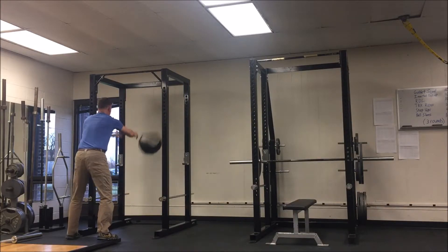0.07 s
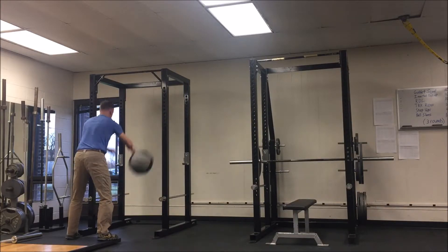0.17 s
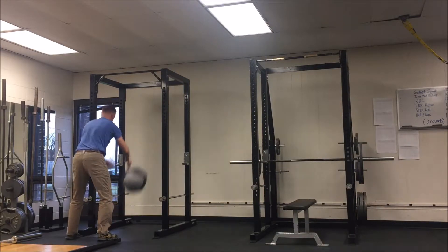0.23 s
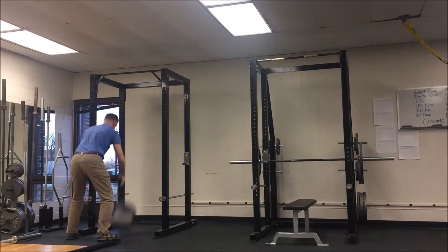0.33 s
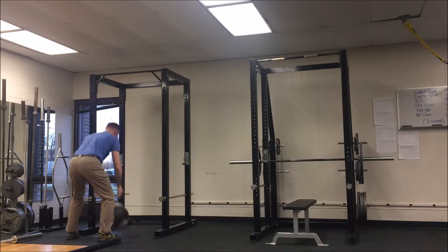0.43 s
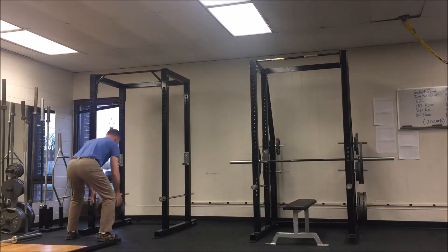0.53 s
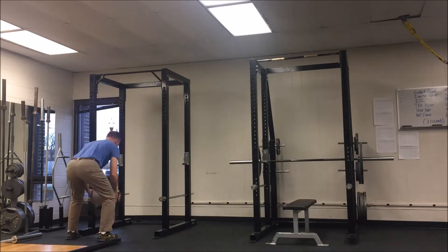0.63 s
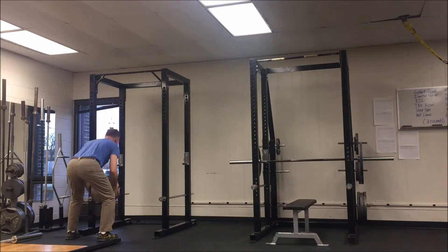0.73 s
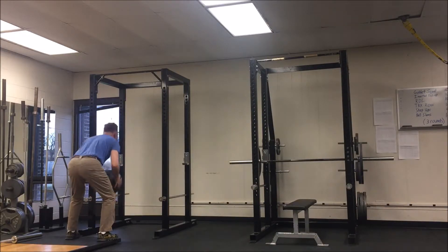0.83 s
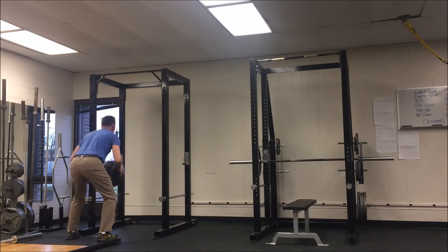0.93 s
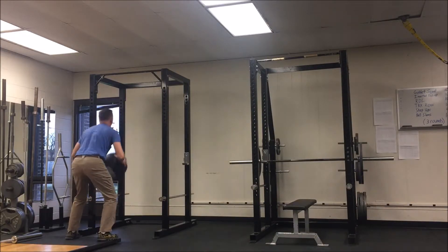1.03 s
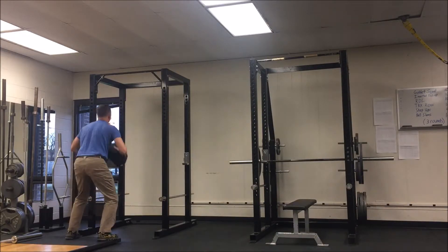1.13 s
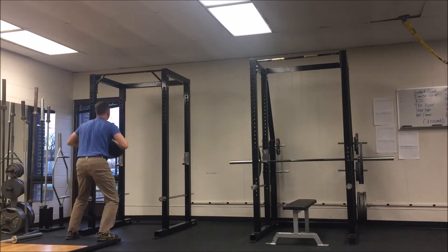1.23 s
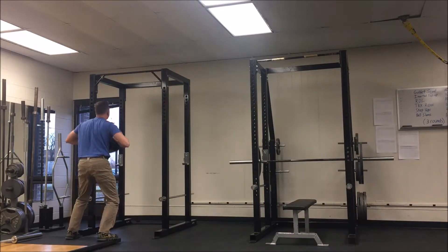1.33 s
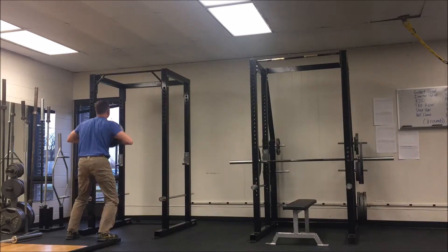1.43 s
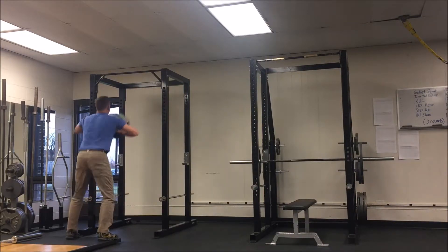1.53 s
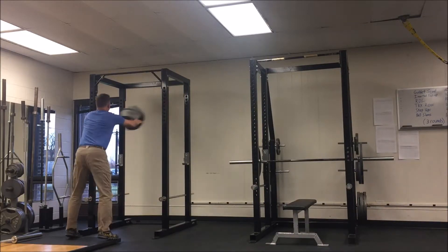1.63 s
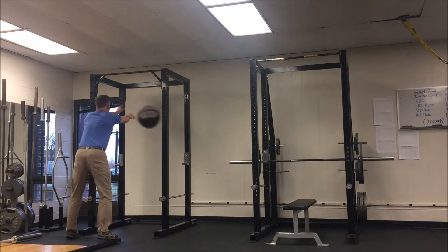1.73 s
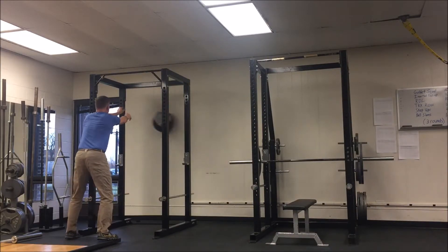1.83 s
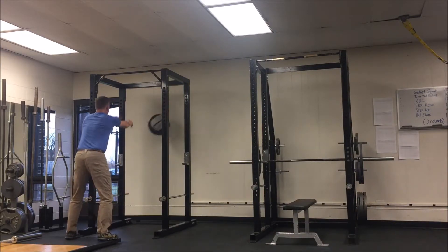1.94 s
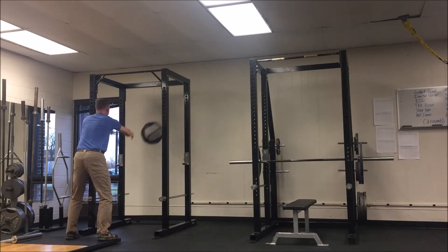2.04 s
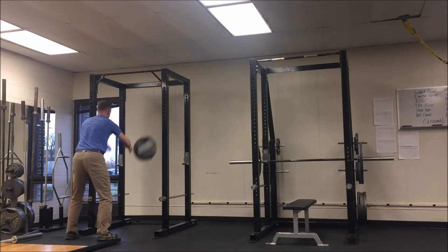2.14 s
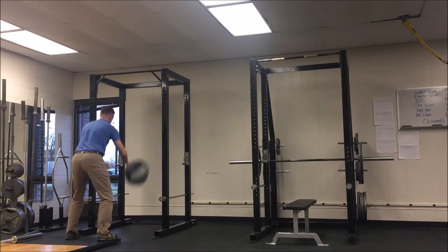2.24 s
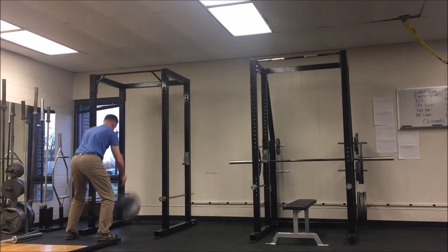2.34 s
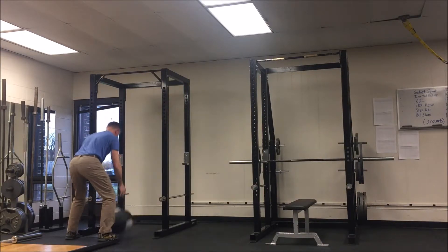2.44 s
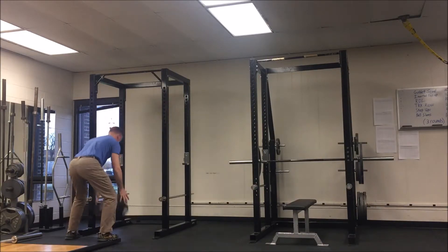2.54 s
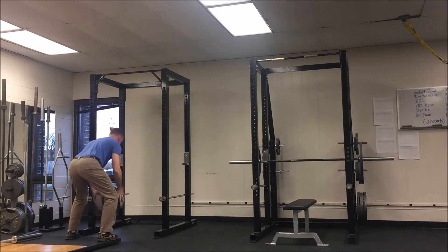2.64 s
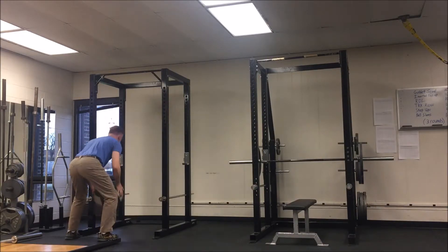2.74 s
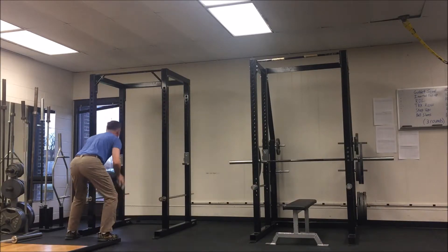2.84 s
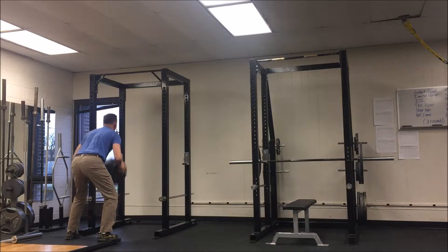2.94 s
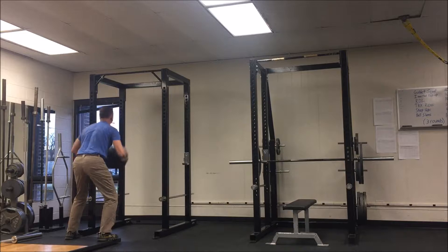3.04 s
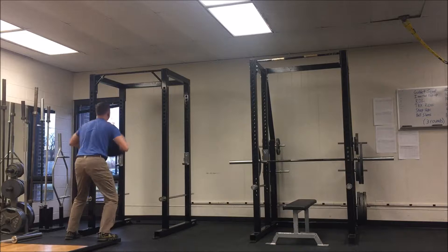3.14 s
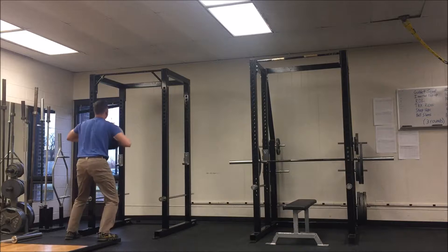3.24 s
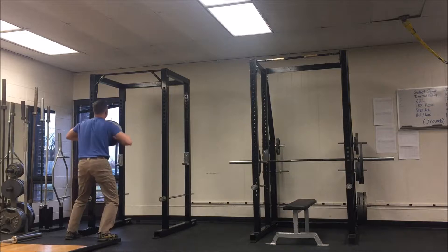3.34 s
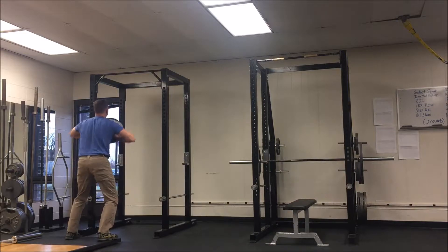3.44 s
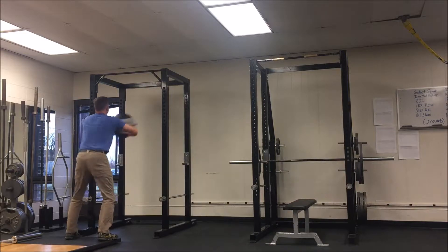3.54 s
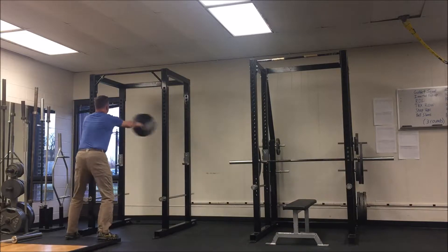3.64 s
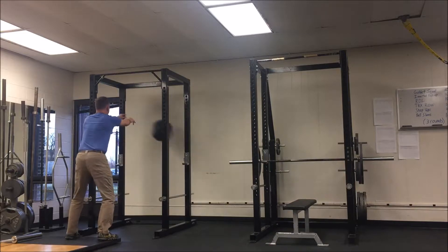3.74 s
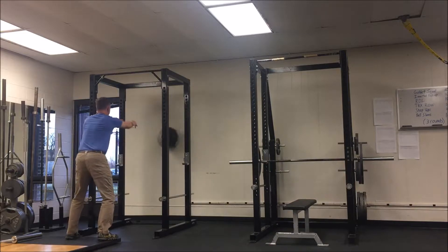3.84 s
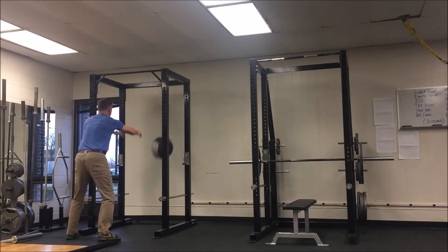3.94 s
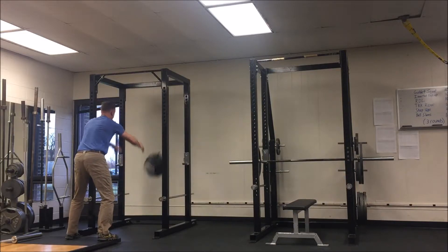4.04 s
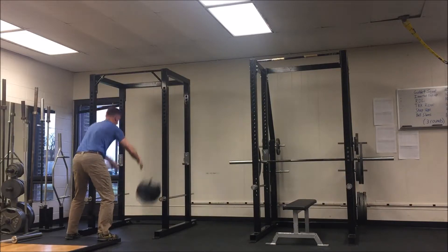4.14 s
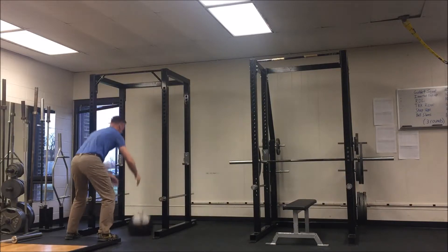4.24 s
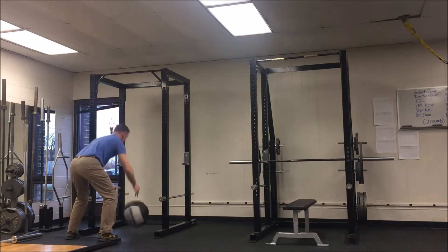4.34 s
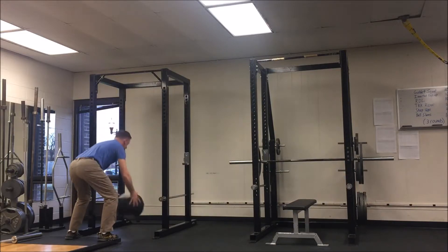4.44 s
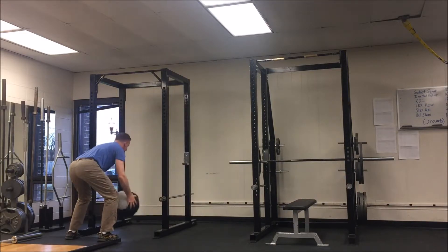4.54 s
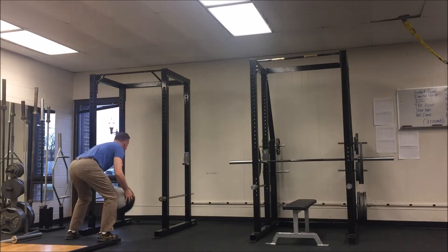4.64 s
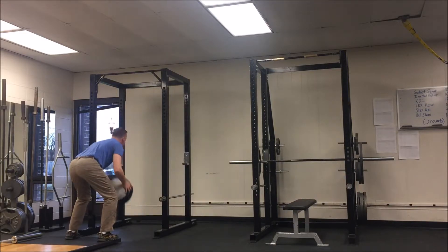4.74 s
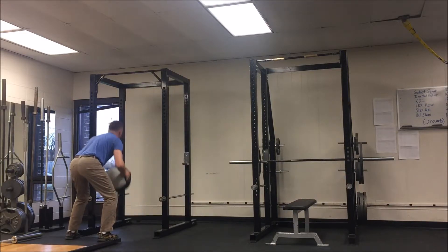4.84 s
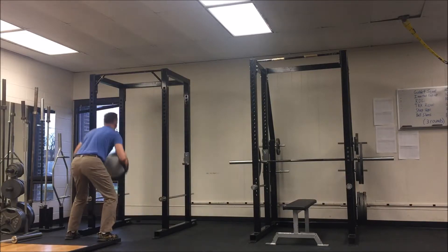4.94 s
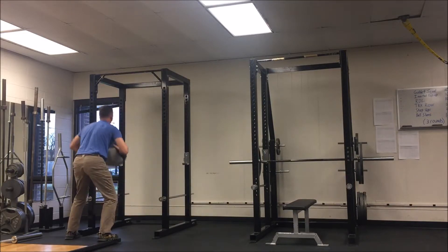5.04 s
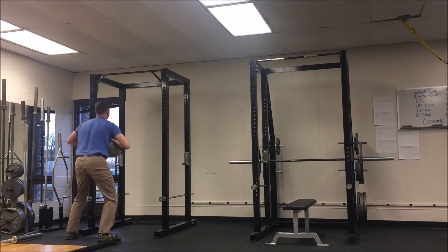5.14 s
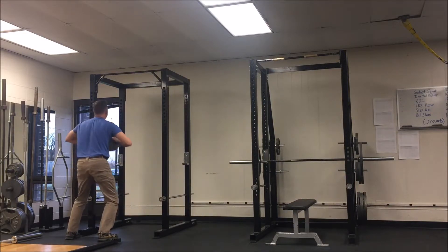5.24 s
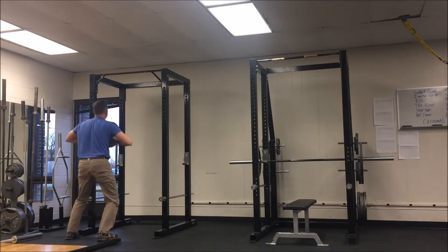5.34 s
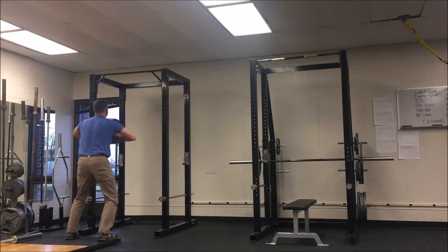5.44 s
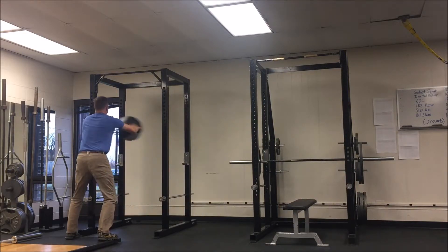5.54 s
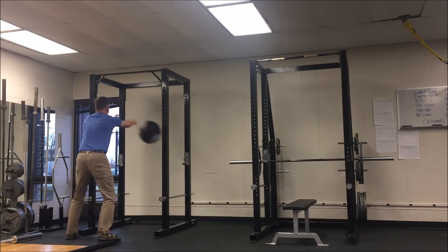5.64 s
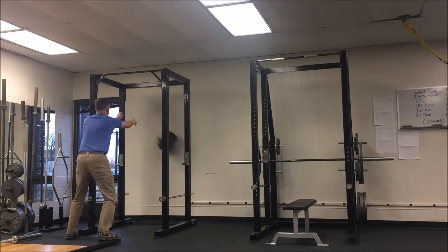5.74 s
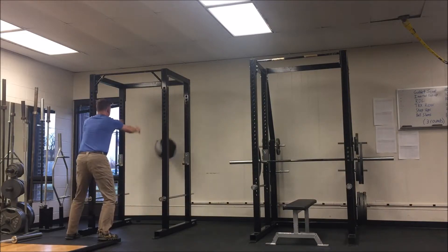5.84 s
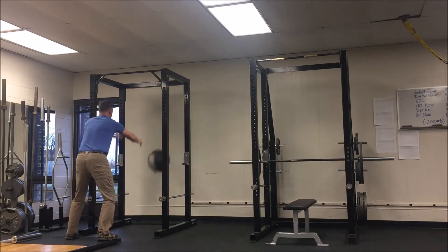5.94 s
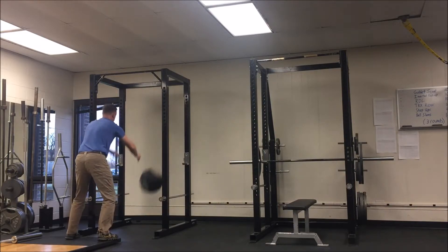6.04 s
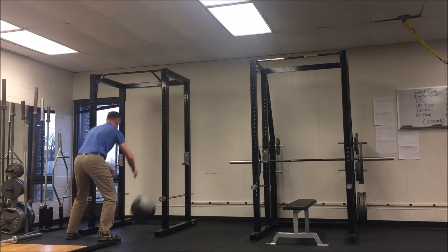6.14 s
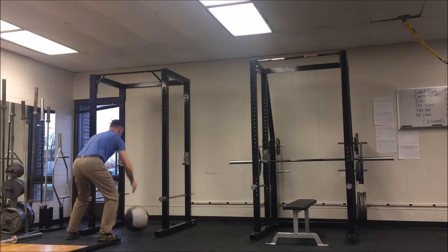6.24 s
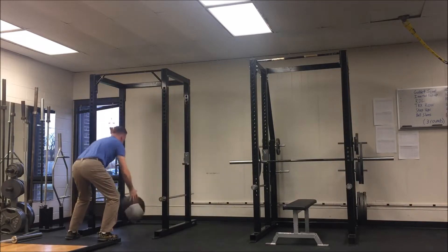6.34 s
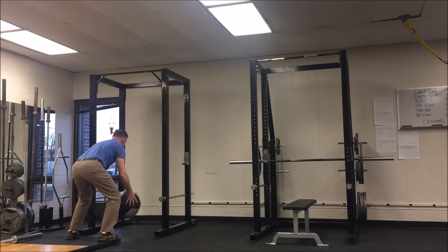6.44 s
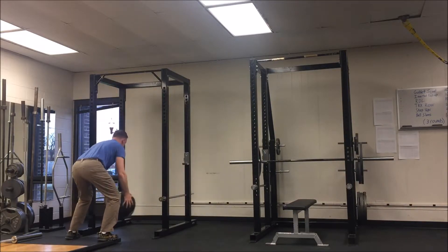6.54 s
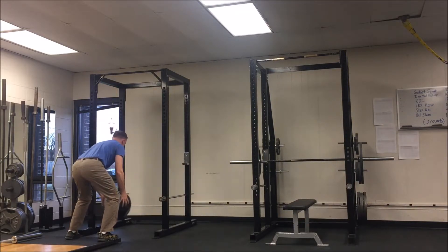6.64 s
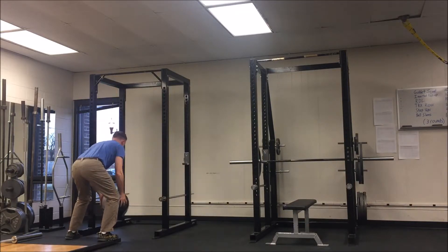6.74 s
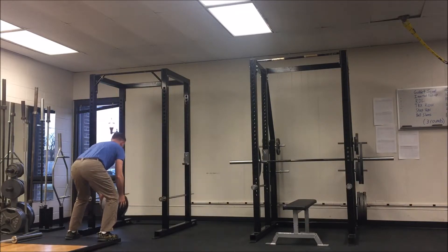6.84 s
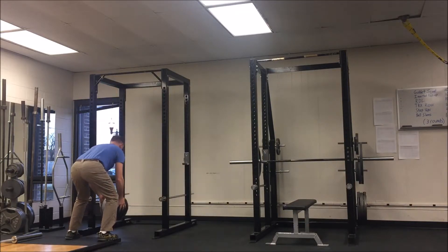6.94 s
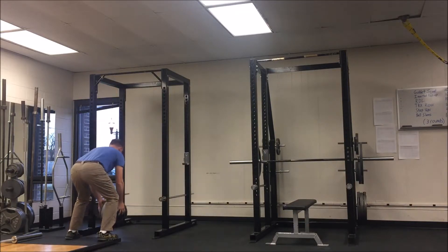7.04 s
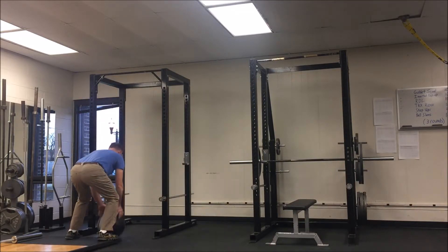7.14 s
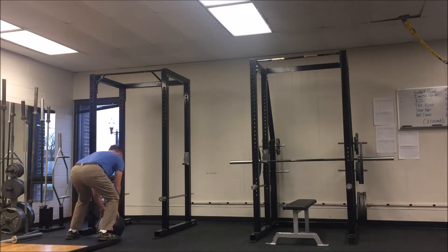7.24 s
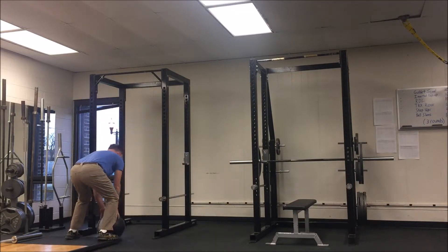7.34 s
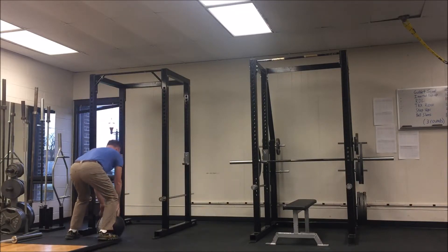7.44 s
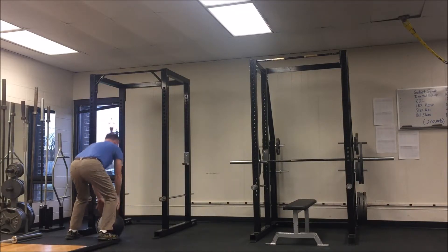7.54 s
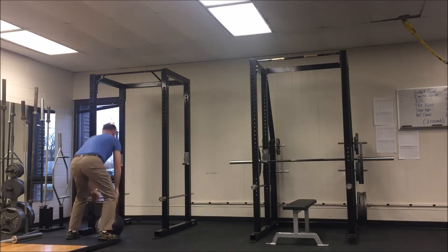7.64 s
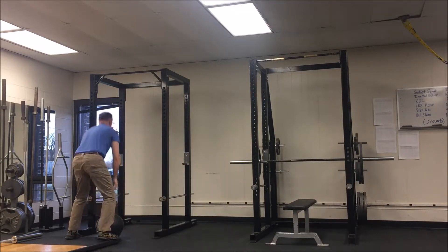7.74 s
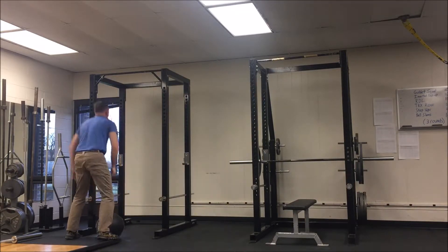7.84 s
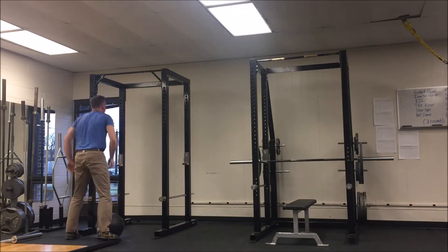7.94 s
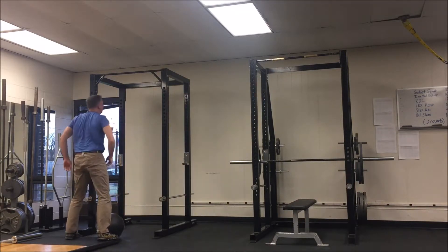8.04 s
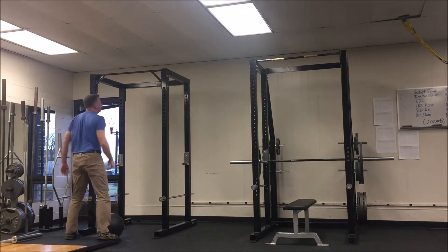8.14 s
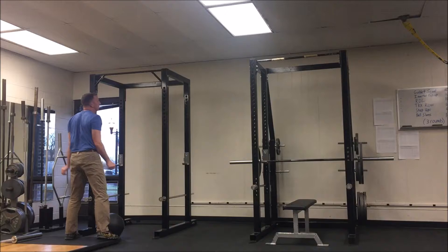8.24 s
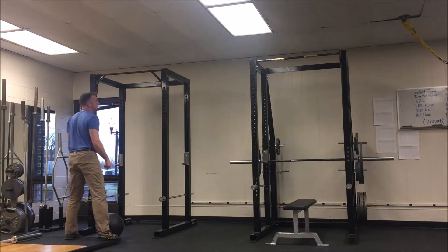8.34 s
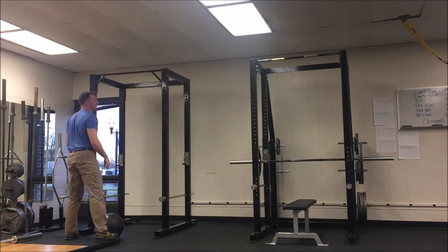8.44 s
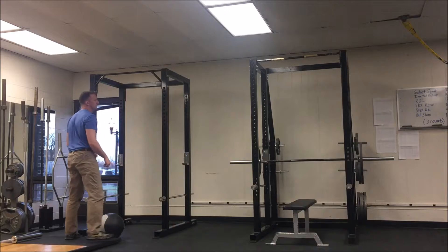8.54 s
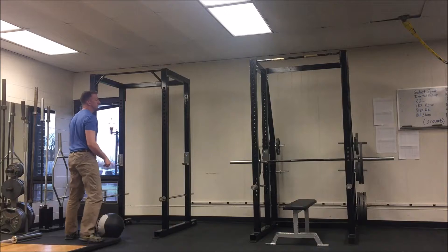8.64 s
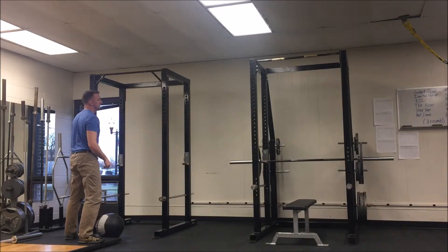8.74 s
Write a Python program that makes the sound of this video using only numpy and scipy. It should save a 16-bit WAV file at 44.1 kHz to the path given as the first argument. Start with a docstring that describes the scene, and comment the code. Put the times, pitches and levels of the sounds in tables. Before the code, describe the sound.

In a small hard weight room with steady low ventilation rumble, a heavy medicine ball is thrown at a block wall, slaps loudly, then thuds on the rubber floor half a second later. This repeats four times, about two seconds apart, with faint palm hiss and shoe scuffs between. A much softer drop ends it, heard from across the room.

```python
"""In a small, hard weight room the ventilation rumbles throughout: coloured noise with a faint steady low hum.
A heavy medicine ball is thrown at a block wall and drops onto the rubber floor, four times. Each blow is
a reverberant slap of the vinyl cover, with damped sines for the ball, the thud and the booming room.
Between blows, grainy friction noise makes palms sliding on the cover and shoes shuffling, and a dull flick
marks each release from the second throw on. At the end the ball is let fall once more, more softly."""
import sys
import numpy as np
from scipy import signal
from scipy.fft import rfft, irfft
from scipy.io import wavfile

SR = 44100
rng = np.random.default_rng(int(sys.argv[2]) if len(sys.argv) > 2 else 0)


def output_pcm(signal):
    """Save a mono or channel-first signal as 16-bit PCM at the path in sys.argv[1].

    Samples are clipped to [-1, 1] before scaling.
    """
    pcm = np.clip(np.atleast_2d(signal).T, -1, 1) * 32767
    wavfile.write(sys.argv[1], SR, np.round(pcm).astype(np.int16))


N = 388080

DECAY_TIME_S = np.arange(int(1.5 * SR)) / SR   # time since a blow

# the ball rolling off the fingers: start_s, level_db (relative), centre_hz
RELEASES = [(1.799, -36.5, 779), (3.752, -44.5, 1450), (5.736, -44, 800)]


def from_db(db):
    """Decibels to gain."""
    return 10 ** (np.asarray(db) / 20)


def rms_one(x):
    """Scale to unit rms."""
    return x / np.sqrt(np.mean(x ** 2) + 1e-20)


def at_hz(points, hz):
    """Read a table on a log-frequency axis."""
    table_hz, values = np.array(points).T
    return np.interp(np.log(hz + 1e-3), np.log(table_hz), values)


def add(out, start_s, sound):
    """Mix a sound in at a time."""
    start = max(round(start_s * SR), 0)
    out[start:start + len(sound)] += sound[:N - start]


def bandpass(x, low_hz, high_hz):
    """Keep one band of frequencies."""
    return signal.sosfilt(signal.butter(2, [low_hz, high_hz], "band", fs=SR, output="sos"), x)


def noise(colour):
    """Steady noise of a given colour, rms 1."""
    spectrum = rfft(rng.standard_normal(N))
    gain = from_db(at_hz(colour, np.fft.rfftfreq(N, 1 / SR)))
    return rms_one(irfft(spectrum * gain, N))


def ventilation(hum_hz=183.0, hum_db=-58, rumble_db=-44.5):
    """Broad duct rumble, shaped from noise, with a faint steady low hum."""
    # colour of the rumble: hz, density_db_per_hz (relative)
    rumble_colour = [(26, -39), (45, -11), (70, -3.5), (210, -8), (243, -18), (326, -14), (359, -17),
                     (387, -17), (519, -29.5), (558, -24.5), (955, -39), (1030, -36), (1380, -40),
                     (4680, -50), (15500, -58.5)]
    rumble = from_db(rumble_db) * noise(rumble_colour)
    hum = np.sqrt(2) * np.sin(2 * np.pi * hum_hz * np.arange(N) / SR)
    return rumble + from_db(hum_db) * hum


def resonate(x, modes):
    """Resonance or notch: lift or hollow out a narrow band for each mode."""
    for hz, width_hz, db in modes:
        peak = signal.lfilter(*signal.iirpeak(hz, hz / width_hz, fs=SR), x)
        x = x + (from_db(db) - 1) * peak
    return x


def echoes(first_per_s=1500, fill_s=.01):
    """Two unrelated trains of reflections, which arrive singly at first and soon crowd together."""
    share = np.clip(first_per_s / SR * (1 + (DECAY_TIME_S / fill_s) ** 2), 1e-3, 1)
    shape = (2, len(DECAY_TIME_S))
    strengths = rng.standard_normal(shape)
    arrives = rng.random(shape) < share
    return strengths * arrives / np.sqrt(share)   # sparse arrivals are stronger, so power stays even


def room_response(arrivals, colour, direct, early_db, early_t60, build_s):
    """Response to one slap: direct sound, a swell of near reflections, then a tail dying band by band."""
    # reverberation: hz, t60_s
    tail_t60 = [(60, 1.3), (170, 1.1), (400, 0.81), (1000, 0.69), (2000, 0.6), (4200, 0.54), (7500, 0.38),
                (13000, 0.25)]
    edges_hz = np.geomspace(35, 17500, 29)
    swell = 1 - .5 * np.exp(-(DECAY_TIME_S / build_s) ** 2)
    near = from_db(early_db - 60 * np.maximum(DECAY_TIME_S - 2 * build_s, 0) / early_t60)
    reflections = arrivals * swell * np.sqrt(1 + near ** 2)
    out = np.zeros(len(DECAY_TIME_S))
    for k, (low_hz, high_hz) in enumerate(zip(edges_hz, edges_hz[1:])):
        hz = np.sqrt(low_hz * high_hz)
        path = reflections[k % 2] * from_db(-60 * DECAY_TIME_S / at_hz(tail_t60, hz))
        path[0] += direct * (-1) ** k   # alternate signs join the bands into one crack
        band = rms_one(bandpass(path, low_hz, high_hz))
        out += band * np.sqrt(high_hz - low_hz) * from_db(at_hz(colour, hz))
    return out / np.sqrt(np.sum(out ** 2))   # unit energy


def ring(modes, contact_s):
    """Damped sines, swelling over the time of the push."""
    waves = sum(from_db(db - 60 * DECAY_TIME_S / t60) * np.sin(2 * np.pi * hz * DECAY_TIME_S)
                for hz, db, t60 in modes)
    return waves * (1 - np.exp(-(DECAY_TIME_S / contact_s) ** 2))


def knock(low_hz=260, high_hz=1700, settle_t60=0.062):
    """The filling slams against the cover and settles: a dense, short burst in the middle range."""
    grains = bandpass(rng.standard_normal(len(DECAY_TIME_S)), low_hz, high_hz)
    return rms_one(grains) * from_db(-60 * DECAY_TIME_S / settle_t60)


def chance_peaks(count=12, low_hz=504, high_hz=6050, width_hz=37, lift_db=4.5):
    """A few narrow random resonances roughen the colour of each blow."""
    places = (np.arange(count) + rng.random(count)) / count   # one in each equal step of pitch
    pitches_hz = low_hz * (high_hz / low_hz) ** places
    return [(hz, width_hz, lift_db) for hz in pitches_hz]


def tilted(colour, body_db, slap_db, body_hz=330, slap_hz=2600):
    """Raise or lower the low body and the high slap of a colour."""
    return [(hz, level + body_db / (1 + (hz / body_hz) ** 2) + slap_db / (1 + (slap_hz / hz) ** 2))
            for hz, level in colour]


def blows(hits, colour, modes, level_db, boom_db, thud_db, knock_db, swell_s, direct, early_db, early_t60,
          ball_t60=0.16):
    """Blows near one spot share part of their echoes; harder ones swell a little longer and weigh more."""
    # lowest standing waves of the room: hz, level_db (relative), t60_s
    boom_modes = [(42.7, -18, 1.8), (45.7, -12.5, 0.41), (65, -31, 2.4)]
    # the ball flattening against a surface: hz, level_db (relative), t60_s
    thud_modes = [(151, -6.5, .12), (193.7, -6.5, 0.09), (287, -7.5, 0.03), (545, -10.5, 0.046),
                  (900, -5.5, 0.033), (1460, -8, 0.018)]
    full_blow_db = -5   # reference strength
    boom_growth, thud_growth = .85, 0.89   # extra dB of boom, and of thud and knock, per dB of strength
    swell_growth = 0.03   # dB of swell time per dB of strength
    out, spot = np.zeros(N), echoes()
    for start_s, db, body_db, slap_db, ball_hz, ball_db in hits:
        force_db = db - full_blow_db
        weight = from_db(thud_growth * force_db)
        own_colour = tilted(colour, body_db, slap_db)
        arrivals = .6 * spot + .8 * echoes()
        build_s = swell_s * from_db(swell_growth * force_db)
        response = room_response(arrivals, own_colour, direct, early_db, early_t60, build_s)
        slap = from_db(level_db) * response
        filling = weight * from_db(knock_db) * knock()
        shell = resonate(slap + filling, list(modes) + chance_peaks())
        ball = ring([(ball_hz, ball_db, ball_t60)], contact_s=0.0056)
        thud = weight * from_db(thud_db) * ring(thud_modes, contact_s=0.0028)
        # the slow push wakes the room's standing waves
        boom = from_db(boom_db + boom_growth * force_db) * ring(boom_modes, contact_s=.03)
        add(out, start_s, from_db(db) * (shell + ball + thud + boom))
    return out


def wall_blows():
    """The thrown ball hits the block wall: slap, dented-ball ring, thud and a strong room boom."""
    # ball on the wall: start_s, strength_db, body_db, slap_db, dented_ball_hz, dented_ball_db (all relative)
    wall_hits = [(0.0395, -6.5, -5, 0, 313, -12.5), (2.0322, -7.5, -1, 1, 227, -3),
                 (3.9797, -6, -2, -5, 364, -13), (5.9499, -5.5, 1, 1.5, 275.4, -9.5)]
    # colour of a blow on the wall: hz, density_db_per_hz (relative)
    wall_colour = [(40, -9.5), (80, -8), (150, -0.5), (300, -2.5), (550, -3), (900, -7.5), (1500, -10.5),
                   (2400, -13), (3800, -14.5), (6500, -19), (9000, -23.5), (12000, -26), (15500, -36.5)]
    # resonances of ball and wall, notches where near reflections cancel: hz, width_hz, lift_db
    wall_modes = [(151, 18, -1.5), (193, 18, -4), (200, 50, 3), (303, 78, 4.5), (365, 32, 1),
                  (461, 27, 3.5), (930, 63, 2.5), (1040, 60, 0), (1220, 73, -3.5), (1540, 350, 2),
                  (1810, 160, -1.5), (2070, 280, 2), (3300, 65, 2.5), (3880, 110, 0)]
    return blows(wall_hits, wall_colour, wall_modes, level_db=23.0, boom_db=2.5, thud_db=2, knock_db=-8.0,
                 swell_s=.007, direct=7.7, early_db=5.5, early_t60=0.48)


def floor_blows():
    """The ball drops onto the rubber floor: the same parts, with less thud, knock and boom."""
    # ball on the floor: start_s, strength_db, body_db, slap_db, dented_ball_hz, dented_ball_db (all relative)
    floor_hits = [(0.5597, -6.5, -0.5, -1, 238.5, -4.5), (2.5824, -7.5, -0.5, 0, 279, -13.5),
                  (4.4306, -6.5, -4, -0.5, 318, -6.5), (6.3787, -9, 1.5, 4, 163, -4),
                  (7.3470, -20, -1, -1.5, 317, -2)]
    # colour of a blow on the floor: hz, density_db_per_hz (relative)
    floor_colour = [(40, -9), (80, -5), (150, -1.5), (300, -3), (450, -3), (600, -7), (1000, -8),
                    (2000, -15), (2900, -16), (6000, -20), (9000, -26), (12000, -29.5), (15500, -42.5)]
    # resonances of ball and floor, notches where near reflections cancel: hz, width_hz, lift_db
    floor_modes = [(120, 6.5, 0), (207, 31, 6.5), (237, 9.4, -3.5), (323.9, 8, 7.5), (372, 35, 3),
                   (451, 53, -7), (587, 82, 5), (705, 31, -1), (860, 81, -1.5), (1010, 50, 1.5),
                   (1490, 70, 1.5), (1690, 130, 2), (1950, 120, 2), (2155, 97, 3.5), (3078, 290, -0.5),
                   (3650, 200, 1)]
    return blows(floor_hits, floor_colour, floor_modes, level_db=23.5, boom_db=-2.5, thud_db=-3.5,
                 knock_db=-13.5, swell_s=.0057, direct=6.9, early_db=7.5, early_t60=0.2)


def stroke(length_s, grain_db, taper=0.25):
    """Friction: a burst of tiny uneven slips that swells and fades."""
    count = max(int(length_s * SR), 8)
    slips = rng.standard_normal(count) * from_db(grain_db * rng.standard_normal(count))
    return rms_one(slips) * signal.windows.tukey(count, taper)


def palms(lead_s=0.043, release_slide_s=0.079, release_slide_db=-60):
    """Skin hisses on the vinyl as palms brake the spinning ball, and around each release."""
    # palms braking the ball: start_s, length_s, level_db (relative)
    catches = [(0.782, 0.07, -50.5), (1.03, 0.06, -58), (2.78, 0.132, -54), (4.645, 0.1, -48.5),
               (6.635, 0.11, -53.5)]
    # colour of the hiss: hz, density_db_per_hz (relative)
    slide_colour = [(500, -17.5), (1500, 1.5), (3000, 0), (5000, 0), (8000, -3.5), (12000, -1.5),
                    (15500, -8)]
    out = np.zeros(N)
    # each release slide starts ahead of the flick and runs on into it
    release_slides = [(s - lead_s, release_slide_s, release_slide_db) for s, _, _ in RELEASES]
    for start_s, length_s, db in list(catches) + release_slides:
        add(out, start_s, from_db(db) * stroke(length_s, grain_db=6.0, taper=.45))
    space = room_response(echoes(), slide_colour, direct=31, early_db=4.5, early_t60=.2, build_s=.007)
    return signal.fftconvolve(out, space)[:N]


def rub(length_s, centre_hz):
    """One dull, grainy rub, heard through the room."""
    # colour of a rub: multiple of its centre, density_db_per_hz (relative)
    rub_colour = [(.12, -2), (.5, 5.5), (1, 2), (1.5, -7.5), (2.4, -19), (5, -30), (12, -51)]
    colour = [(centre_hz * ratio, level) for ratio, level in rub_colour]
    space = room_response(echoes(), colour, direct=27, early_db=10, early_t60=0.11, build_s=.005)
    return signal.fftconvolve(stroke(length_s, grain_db=9, taper=0.63), space)


def shoes():
    """Soles shuffle and pivot: dull friction on the floor."""
    # scuffs: start_s, length_s, level_db (relative), centre_hz
    scuffs = [(1.288, 0.022, -53, 1000), (3.236, .07, -52, 600), (4.949, 0.069, -42, 1236),
              (4.996, 0.022, -41.5, 1470), (5.01, .15, -48.5, 897), (5.327, 0.026, -51.5, 1000),
              (5.457, 0.21, -56, 1100)]
    out = np.zeros(N)
    for start_s, length_s, db, centre_hz in scuffs:
        add(out, start_s, from_db(db) * rub(length_s, centre_hz))
    return out


def fingers(flick_s=.026):
    """The ball rolls off the fingertips with a short, dull flick of friction."""
    out = np.zeros(N)
    for start_s, db, centre_hz in RELEASES:
        add(out, start_s, from_db(db) * rub(flick_s, centre_hz))
    return out


def scene():
    """All sources as they reach the microphone, in one channel."""
    blows_heard = wall_blows() + floor_blows()
    handling = palms() + shoes() + fingers()
    return (ventilation() + blows_heard + handling)[None]


def record(dry, ceiling=2.0, cutoff_hz=15900):
    """The microphone port colours the treble, peaks are rounded, the top is cut."""
    # hollows of the microphone port: hz, width_hz, lift_db
    port_dips = [(4950, 450, -4), (10500, 1100, -3.5)]
    coloured = resonate(dry, port_dips)
    rounded = ceiling * np.tanh(coloured / ceiling)
    return signal.sosfilt(signal.ellip(10, .1, 80, cutoff_hz, fs=SR, output="sos"), rounded)


dry = scene()
out = record(dry)
output_pcm(out)
```